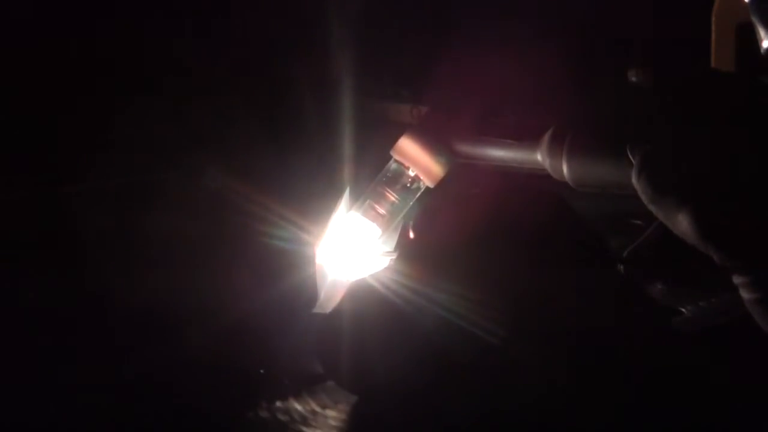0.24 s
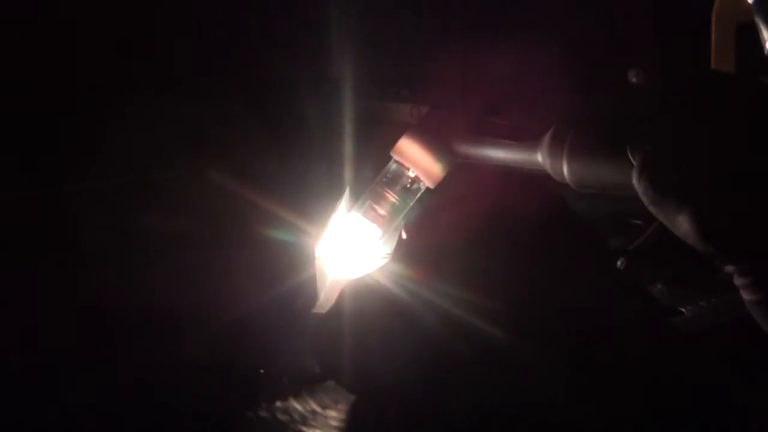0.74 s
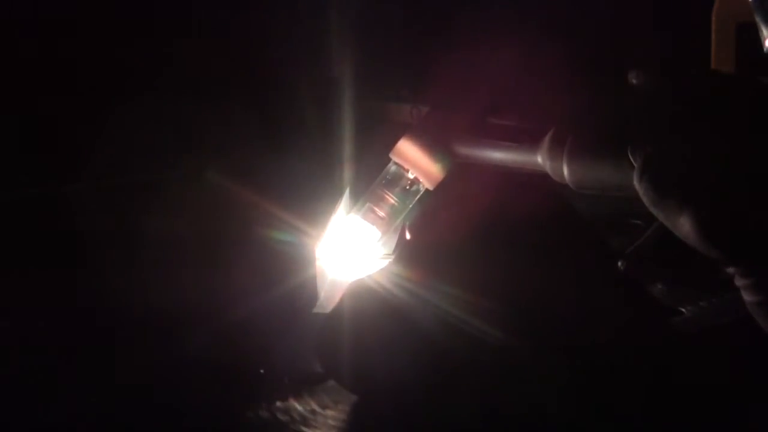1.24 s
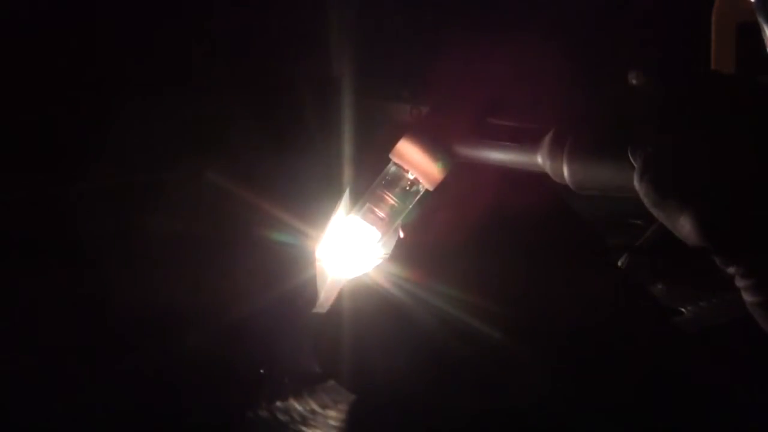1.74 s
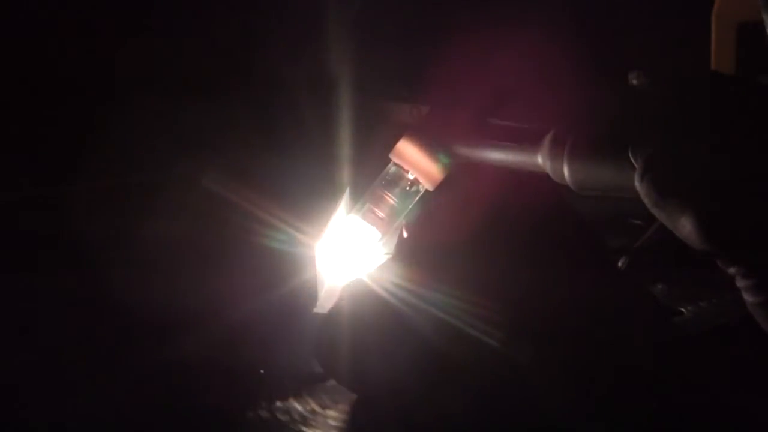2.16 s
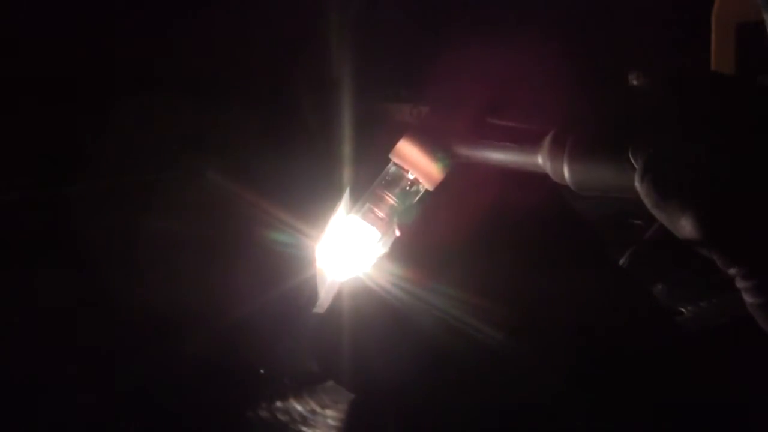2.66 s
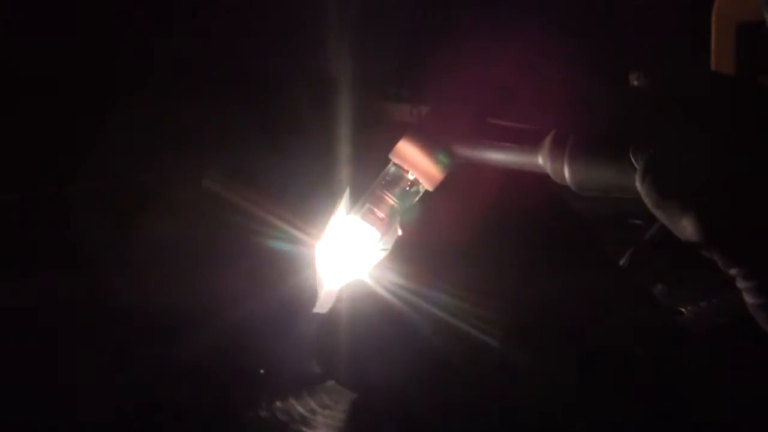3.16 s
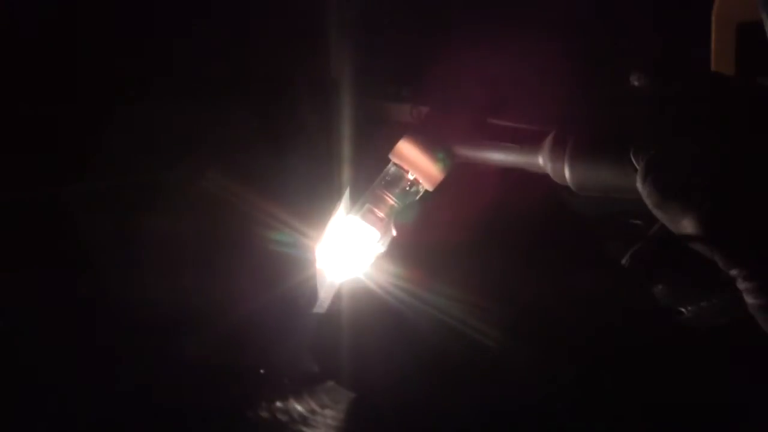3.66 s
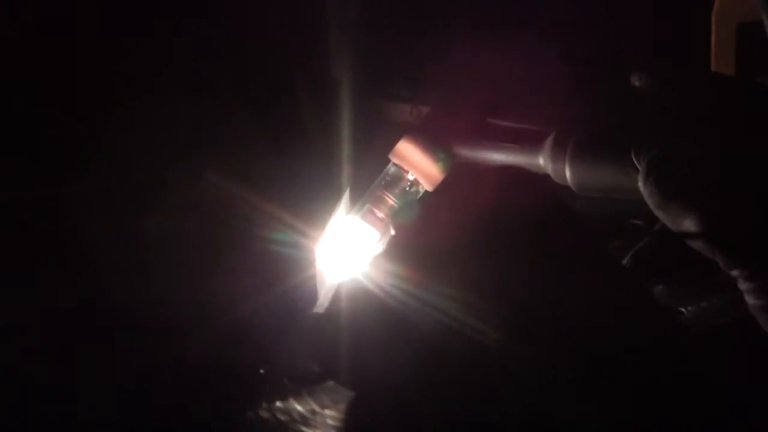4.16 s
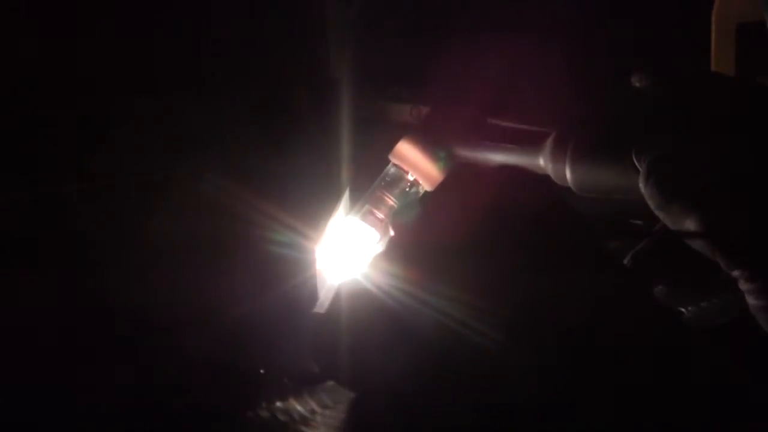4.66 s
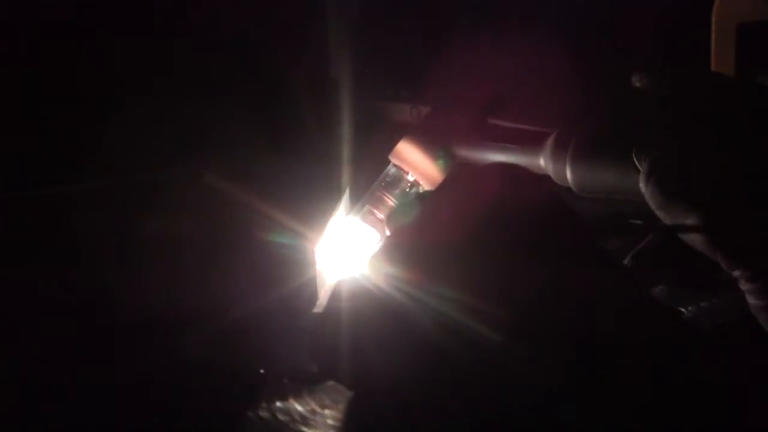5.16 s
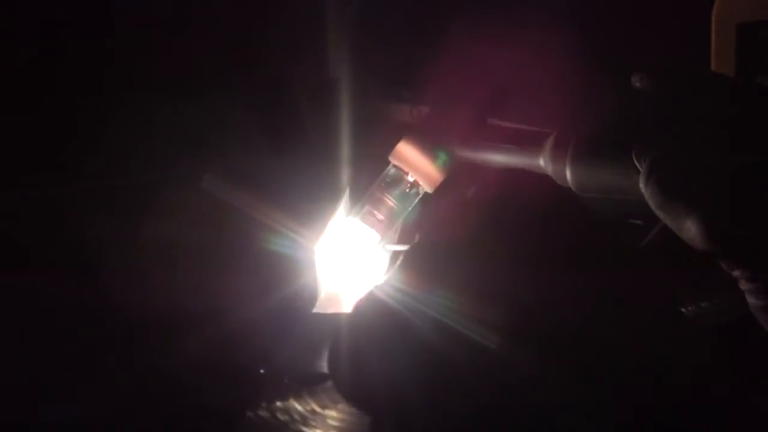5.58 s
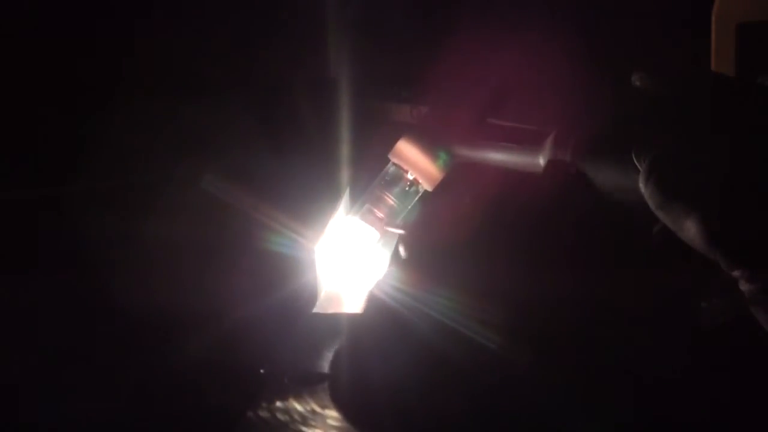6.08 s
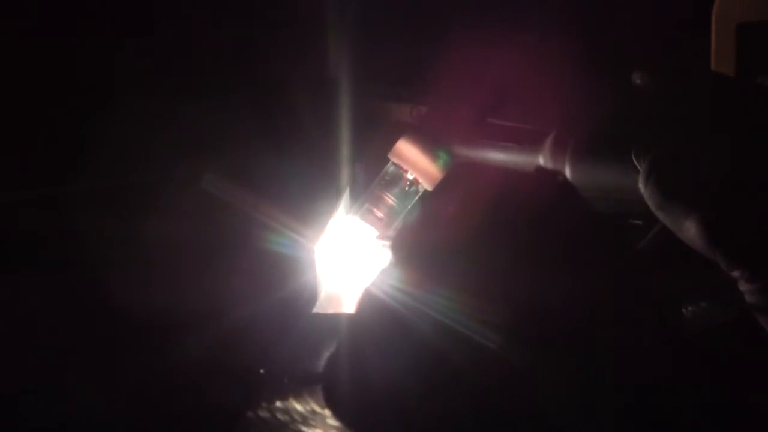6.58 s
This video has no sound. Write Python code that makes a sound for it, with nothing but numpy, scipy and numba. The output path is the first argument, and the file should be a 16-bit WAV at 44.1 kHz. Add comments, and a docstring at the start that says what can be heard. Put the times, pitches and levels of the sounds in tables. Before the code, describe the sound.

Close microphone on an electric welding arc already running and never stopping. Dense sharp snaps, about seventy cycles a second, fuse into a harsh metallic buzz with sizzling, crackling treble. Irregular small pops and molten spits appear, fizz is thickest from one to four seconds, and late on the torch shifts, changing the colour, with small flutters. Soft gas hiss, thin fan tones and slight room reverberation surround it.

```python
"""AC TIG arc on metal

An alternating-current arc buzzes in a workshop: each cycle snaps at collapse, restrike and reversal.
Filtered clicks make the snaps, cracks, pops and pool splutter; gated noise makes the oxide fizz.
Shielding gas is steady coloured noise, the fan two wavering sines, the hum a sum of harmonics.
Torch cup, arc length and torch shift filter the arc; bench and room add noise-burst echoes."""
import sys
import numpy as np
from scipy import signal
from scipy.fft import rfft, irfft
from scipy.io import wavfile
from numba import njit

SR = 44100
rng = np.random.default_rng(int(sys.argv[2]) if len(sys.argv) > 2 else 0)


def wrap_up_sound(samples):
    """Save the sound to the file named by the first command line argument, as 16-bit audio."""
    columns = np.atleast_2d(samples).T
    # keep every value between -1 and 1, then stretch to whole-number steps
    tamed = np.clip(columns, -1, 1)
    steps = np.round(tamed * 32767).astype(np.int16)
    wavfile.write(sys.argv[1], SR, steps)


N = 300761
TIME = np.arange(N) / SR
BINS_HZ = np.maximum(np.arange(2049) * SR / 4096, 1)

ARC_HZ = 72.4768
# moments in the first cycle
COLLAPSE_S, RESTRIKE_S, REVERSE_S = 0.0059, 0.00653, 0.01283


def from_db(db):
    """Decibels to amplitude gain."""
    return 10 ** (np.asarray(db) / 20)


def rms_one(x):
    """Scale to unit power."""
    return x / np.sqrt(np.mean(x ** 2) + 1e-20)


def at_time(rows, s):
    """Interpolate a two-column curve at times s."""
    return np.interp(s, *np.transpose(rows))


def spectrum(rows, column=1):
    """One column of a spectrum table, in dB at every bin, linear over log frequency."""
    rows = np.array(rows)
    return np.interp(np.log(BINS_HZ), np.log(rows[:, 0]), rows[:, column])


def resonances(rows):
    """Bell-shaped peaks and notches, in dB at every bin."""
    return sum(db / (1 + (2 * (BINS_HZ - hz) / width_hz) ** 2) for hz, width_hz, db in rows)


def colour(x, curve_db):
    """Minimum-phase filter: it rings after a click, never before."""
    cepstrum = irfft(np.log(from_db(curve_db)))
    half = len(cepstrum) // 2
    cepstrum[1:half] *= 2
    cepstrum[half + 1:] = 0
    impulse_response = irfft(np.exp(rfft(cepstrum)))
    return signal.fftconvolve(x, impulse_response)[:N]


def clicks(times, sizes, size=12):
    """Band-limited impulses at exact times, between the samples."""
    index = np.round(times * SR).astype(int)[:, None] + np.arange(-size, size + 1)
    offset = index - times[:, None] * SR
    shape = np.sinc(offset) * np.sinc(offset / (size + 1)) * sizes[:, None]
    return np.bincount(np.maximum(index, 0).ravel(), shape.ravel(), N)[:N]


def cycles(first_s):
    """One moment in every cycle of the current."""
    return first_s + np.arange(int(N / SR * ARC_HZ) + 1) / ARC_HZ


def swells(rows, s):
    """Brief Gaussian swells from rows of (t/s, length/s, level/dB)."""
    return sum(db * np.exp(-(2 * (s - at) / length) ** 2) for at, length, db in rows)


def drift(s, per_s):
    """Random values, per_s of them a second, joined by straight lines."""
    return np.interp(s * per_s, np.arange(400), rng.standard_normal(400))


# fizz of the oxide being stripped, before trim: t/s, level/dB
FIZZ = [(0, -26.5), (0.22, -34), (0.9, -28.5), (1.2, -22), (1.45, -26), (1.82, -25.5), (2.12, -20),
        (2.45, -23.5), (2.63, -21), (2.82, -25), (3.13, -23.5), (3.24, -21), (3.5, -27), (3.82, -23),
        (4.2, -30), (5.25, -32.5), (5.78, -27.8), (6.0, -33.5), (6.82, -36)]
CLEAN_METAL_DB = -31  # reference on the FIZZ scale


def oxide(s):
    """Oxide under the arc, as dB of fizz relative to clean metal."""
    return at_time(FIZZ, s) - CLEAN_METAL_DB


# brief falters of the arc: t/s, length/s, depth/dB
FALTERS = [(.975, 0.037, 1), (1.81, 0.18, 1.4), (2.28, 0.1, 1), (2.935, 0.058, 3), (4.03, 0.061, 2.3),
           (5.6, 0.079, 1), (6.16, .07, 3.2), (6.34, .04, 2), (6.46, .06, 3.2)]


def falter_db(s):
    """Depth by which the arc falters."""
    return swells(FALTERS, s)


SHIFT_START_S, SHIFT_END_S = 5.26, 5.7


def shifted(s):
    """How far the torch has shifted, 0-1."""
    return np.interp(s, [SHIFT_START_S, SHIFT_END_S], [0, 1])


FORCE_DB, SHIFT_FORCE_DB = -1.19, -0.5
FORCE_PER_FIZZ = 0.045  # dB per dB


def arc_force(s):
    """Arc force in dB: harder on oxide, weaker in a falter and after the torch shift."""
    return FORCE_DB + FORCE_PER_FIZZ * oxide(s) + SHIFT_FORCE_DB * shifted(s) - falter_db(s)


# gas noise density, relative: f/Hz, level/(dB per Hz)
GAS_COLOUR = [(25, -8.5), (110, -10), (230, -3), (400, 3), (750, -2), (1050, -19.5), (1600, -1), (3200, -2),
              (8000, 5), (10000, 0.5), (13000, -26), (15500, -37)]


def gas(rms_db):
    """Shielding gas: steady turbulent hiss from coloured noise."""
    hiss = colour(rng.standard_normal(N), spectrum(GAS_COLOUR))
    return from_db(rms_db) * rms_one(hiss)


# fan tones: f/Hz, level/dB rms
FAN = [(457.6, -52.5), (1044, -53)]


def fan(waver_rad):
    """Cooling fan: two thin tones sharing a random-walk phase."""
    knots = np.linspace(0, N / SR, 40)
    walk = np.cumsum(rng.standard_normal(len(knots)))
    phase = waver_rad * np.interp(TIME, knots, walk)
    return sum(np.sqrt(2) * from_db(db) * np.sin(2 * np.pi * hz * TIME + phase) for hz, db in FAN)


# buzz harmonics, relative: multiple of ARC_HZ, level/dB
HUM_ORDERS = [(3, -17.5), (4, -20.5), (5, -13), (6, -9.5), (7, -11.5), (8, -11), (9, -2.5), (10, -8),
              (11, -0.5), (12, -13), (13, -8), (14, -16), (15, -10.5), (16, -13.5), (17, -10), (18, -9.5),
              (19, -8), (20, -7), (21, -42), (22, -12.5)]
HUM_PER_FIZZ = -0.29  # dB per dB


def hum(level_db, smear_rad, follows):
    """Harmonics phased by two opposite pressure kicks a cycle; reflections smear their timing."""
    out = np.zeros(N)
    second_kick_s = REVERSE_S + RESTRIKE_S - COLLAPSE_S
    for multiple, db in HUM_ORDERS:
        rad_per_s = 2 * np.pi * round(multiple) * ARC_HZ
        kicks = np.exp(-1j * rad_per_s * RESTRIKE_S) - np.exp(-1j * rad_per_s * second_kick_s)
        phase = np.angle(kicks) + smear_rad * rng.standard_normal()
        out += from_db(db) * np.cos(rad_per_s * TIME + phase)
    strength_db = level_db + HUM_PER_FIZZ * oxide(TIME) + follows * arc_force(TIME)
    return rms_one(out) * from_db(strength_db)


# fizz noise density, relative: f/Hz, level/(dB per Hz)
FIZZ_COLOUR = [(120, -37), (250, -20.5), (400, -11.5), (750, -6.5), (1050, -11), (1300, -4.5), (1600, -4),
               (2200, -12), (3200, 2.5), (5000, -2.5), (8000, -4), (10000, -9.5), (13000, -24),
               (15500, -30)]
FALTER_FIZZ = 1.8  # dB per dB of falter


def fizz(level_db, flicker_db, start_db, fade_s):
    """Cathode spots dart over the oxide from reversal to restrike, then die away."""
    since = (TIME - REVERSE_S) % (1 / ARC_HZ)
    length = (RESTRIKE_S - REVERSE_S) % (1 / ARC_HZ)
    rise = from_db(start_db * np.maximum(1 - since / length, 0))
    gate = rise * np.exp(-np.maximum(since - length, 0) / fade_s)
    times = cycles(REVERSE_S)
    flicker = np.interp(TIME, times, rng.standard_normal(len(times)))
    strength_db = level_db + at_time(FIZZ, TIME) - FALTER_FIZZ * falter_db(TIME) + flicker_db * flicker
    spots = rng.standard_normal(N) * gate * from_db(strength_db)
    shape_db = spectrum(FIZZ_COLOUR)
    return colour(spots, shape_db) / np.sqrt(np.mean(from_db(shape_db) ** 2))


# snap spectra before arc force: f/Hz, collapse level/dB, restrike level/dB, reversal level/dB
SNAPS = [(500, -33, -37, -39.5), (1060, -17.5, -11, -13), (1590, 8.5, 4.5, 4), (1780, 12, 3.5, -3.5),
         (2535, 6, 4, -6), (3424, 16, 9.5, 13), (4280, 3, 12.5, 1), (6220, -8.5, 9, -3),
         (7780, -4.5, 5, -0.5), (9540, -21.5, -1.5, -5.5), (12900, -9, -15.5, -18.5),
         (14900, -36, -35.5, -53)]


def snaps(scatter_db, reversal_scatter_db, reversal_follows):
    """Collapse pushes, restrike and reversal pull; the reversal scatters less and follows force less."""
    force_db = arc_force(cycles(COLLAPSE_S))
    chance = rng.standard_normal((len(force_db), 3))
    reversal_db = reversal_follows * force_db + reversal_scatter_db * chance[:, 2]
    collapse = clicks(cycles(COLLAPSE_S), from_db(force_db + scatter_db * chance[:, 0]))
    restrike = clicks(cycles(RESTRIKE_S), from_db(force_db + scatter_db * chance[:, 1]))
    reversal = clicks(cycles(REVERSE_S), from_db(reversal_db))
    push = colour(collapse, spectrum(SNAPS, column=1))
    pull = colour(restrike, spectrum(SNAPS, column=2))
    return push - pull - colour(reversal, spectrum(SNAPS, column=3))


# pool splutters: t/s, length/s, level change/dB
SPLUTTERS = [(1.12, .07, 14), (1.75, 0.044, 13), (2.45, 0.16, -1), (5.68, 0.061, 8), (6.425, 0.046, 15)]
# push spectrum before level: f/Hz, level/dB
SPUTTER_COLOUR = [(120, -30), (400, -5.5), (800, 9), (1050, 0), (1300, 2), (1800, 1), (2400, -3.5),
                  (5000, -19)]


def sputter(level_db, wander_db):
    """Each reversal jolts the molten pool: a dull push of random size and sign."""
    times = cycles(REVERSE_S)
    db = level_db + swells(SPLUTTERS, times) + wander_db * drift(times, per_s=9.6)
    pushes = clicks(times, from_db(db) * rng.uniform(-0.54, 1, len(times)))
    return colour(pushes, spectrum(SPUTTER_COLOUR))


# crack spectrum before level: f/Hz, level/dB
CRACK_COLOUR = [(150, -22), (400, -22), (800, -3.5), (2000, -4), (3300, 6), (6000, -2.5), (9000, -1),
                (13000, -12.5), (15500, -40)]


def crackle(level_db, wander_db, spread_db, lag_s):
    """After each reversal the arc catches up to lag_s late, with a crack of random size and sign."""
    times = cycles(REVERSE_S)
    spread = rng.uniform(-1.37, 1, len(times))
    sizes = from_db(level_db + wander_db * drift(times, per_s=3.6) + spread_db * spread)
    signs = rng.choice([-1, 1], len(times))
    cracks = clicks(times + lag_s * rng.random(len(times)), sizes * signs)
    return colour(cracks, spectrum(CRACK_COLOUR))


# late ignitions, before colour: t/s, level/dB
POPS = [(1.02, -19), (1.117, -18), (1.172, -27), (1.338, -21), (1.751, -24), (2.221, -26), (2.276, -20),
        (2.717, -23), (3.393, -24), (4.414, -19), (5.573, -20), (5.587, -23), (5.725, -21), (6.429, -21)]
# pop spectrum: f/Hz, level/dB
POP_COLOUR = [(150, -25), (400, 26), (1100, 14), (2200, 27.5), (3300, 32), (6000, 23.5), (10000, 23),
              (15500, -6)]


def pops(lag_s):
    """Some reversals ignite late with a pop, lag_s after the nearest reversal."""
    s, db = np.transpose(POPS)
    reversal = REVERSE_S + np.round((s - REVERSE_S) * ARC_HZ) / ARC_HZ
    return -colour(clicks(reversal + lag_s, from_db(db)), spectrum(POP_COLOUR))


# peaks and notches of torch cup and workpiece: f/Hz, width/Hz, level/dB
CUP = [(1564, 160, -9), (1744, 130, 2.5), (1898, 123, 6.5), (1990, 31, -13.5), (2278, 59, 5.5),
       (2995, 250, 1.5), (3305, 190, -2), (3700, 280, 0.5), (4080, 290, -7), (4480, 170, 1),
       (4840, 420, 0.5), (5310, 810, 5), (6300, 580, -5), (7030, 160, 8.5), (7237, 180, -12),
       (7580, 410, 5), (7860, 180, -2), (8630, 410, 2), (9600, 50, -16), (11550, 700, -5.5),
       (12460, 600, 7)]


def cup(x):
    """Torch cup and workpiece resonate and cancel at fixed pitches."""
    return colour(x, resonances(CUP))


# treble resonances in the torch cup: f/Hz, width/Hz
LINGER = [(7200, 2400), (9300, 1800), (12300, 1200)]


def linger(x):
    """All-pass resonances hold the treble back a moment and stretch each snap."""
    for hz, width_hz in LINGER:
        r = np.exp(-np.pi * width_hz / SR)
        poles = np.array([1, -2 * r * np.cos(2 * np.pi * hz / SR), r * r])
        x = signal.lfilter(poles[::-1], poles, x)
    return x


@njit
def moving_band(x, tuning, damping):
    """State-variable band-pass with a gliding centre, gain 1 on top."""
    out = np.zeros(len(x))
    first, second = 0.0, 0.0
    for i in range(len(x)):
        g = tuning[i]
        band = (first + g * (x[i] - second)) / (1 + g * (g + damping))
        first = 2 * band - first
        second += 2 * g * band
        out[i] = damping * band
    return out


# notch from the arc's mirror image in the metal, lower as the arc lengthens: t/s, f/Hz
ARC_NOTCH = [(0, 11400), (2.6, 10700), (4.0, 10100), (5.3, 9800), (5.45, 7440), (5.7, 5900), (6.8, 5540)]


def arc_length(x, notch_db, notch_share, peak_db, peak_share):
    """Arc and image cancel at the notch, add up an octave above; widths are shares of the pitch."""
    notch_hz = at_time(ARC_NOTCH, TIME)
    for hz, db, share in (notch_hz, notch_db, notch_share), (2 * notch_hz, peak_db, peak_share):
        tuning = np.tan(np.pi * np.minimum(hz / SR, 0.45))
        x = x + (from_db(db) - 1) * moving_band(x, tuning, share)
    return x


# further peaks and notches at full torch shift: f/Hz, width/Hz, level/dB
SHIFTED = [(1310, 360, 7), (1944, 120, 6.5), (2220, 700, -4), (4340, 240, 2.5), (5870, 120, -10),
           (7640, 160, 5), (11300, 1300, 1.5), (11860, 400, 2.5), (12800, 320, -10)]


def torch_shift(x):
    """Crossfade to further resonances as the torch shifts."""
    shift = shifted(TIME)
    return (1 - shift) * x + shift * colour(x, resonances(SHIFTED))


def workshop(x, first_s, bench_db, bench_s, room_db, room_t60_s):
    """Scatter from the bench close by, plus the diffuse tail of the room."""
    t = TIME[:SR // 2]
    decays = [np.exp(-t / bench_s), from_db(-60 * t / room_t60_s)]
    tails = rng.standard_normal((2, len(t))) * (t > first_s) * decays
    bench, room = tails / np.linalg.norm(tails, axis=1, keepdims=True)
    echoes = from_db(bench_db) * bench + from_db(room_db) * room
    return x + signal.fftconvolve(x, echoes)[:N]


def scene():
    """The arc, coloured by its surroundings, over hum, gas and fan."""
    arc = fizz(level_db=-0.94, flicker_db=3.0, start_db=-3.0, fade_s=0.00083)
    arc = arc + snaps(scatter_db=0.68, reversal_scatter_db=0.4, reversal_follows=0.53)
    arc = arc + sputter(level_db=-4, wander_db=4.0)
    arc = arc + crackle(level_db=-6.5, wander_db=2.0, spread_db=6.5, lag_s=0.000312)
    arc = arc + pops(lag_s=0.00017)
    arc = linger(cup(arc))
    arc = arc_length(arc, notch_db=-1.5, notch_share=0.078, peak_db=6.5, peak_share=0.44)
    arc = torch_shift(arc)
    arc = workshop(arc, first_s=0.001, bench_db=-16.5, bench_s=0.00083, room_db=-13.5, room_t60_s=0.97)
    buzz = hum(level_db=-32.0, smear_rad=0.34, follows=0.43)
    return (arc + buzz + gas(rms_db=-38) + fan(waver_rad=0.75))[None]


CUTOFF_HZ = 15800


def record(dry):
    """Round off the tallest peaks and cut the top steeply."""
    rounded = dry / (1 + (dry / 0.78) ** 6) ** (1 / 6)
    lowpass = signal.ellip(12, 0.1, 90, CUTOFF_HZ, fs=SR, output="sos")
    return signal.sosfilt(lowpass, rounded)


dry = scene()
out = record(dry)
wrap_up_sound(out)
```